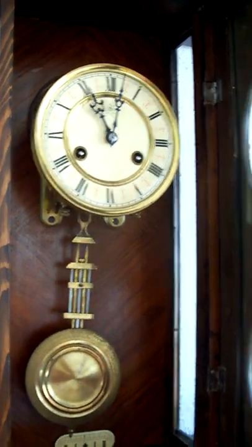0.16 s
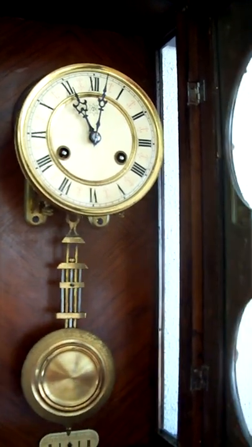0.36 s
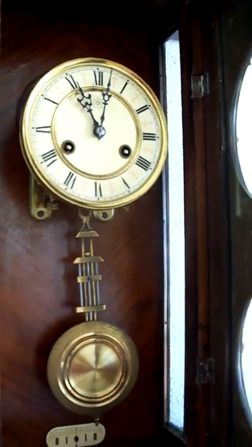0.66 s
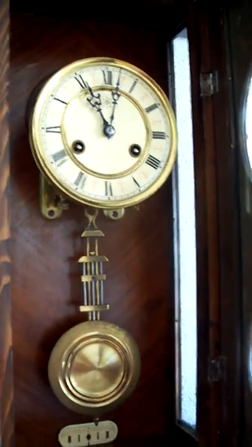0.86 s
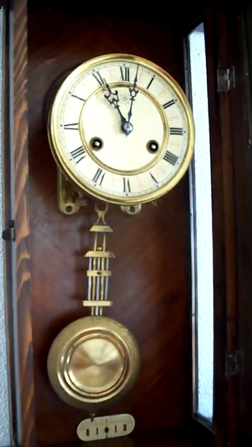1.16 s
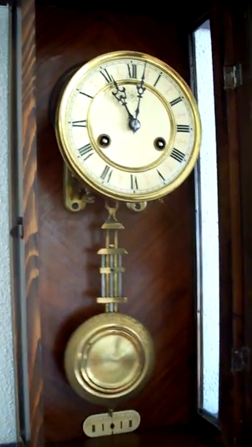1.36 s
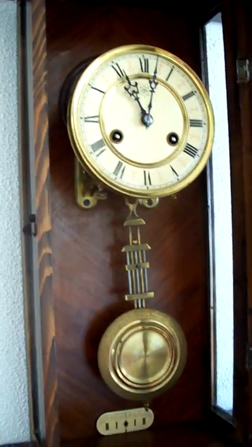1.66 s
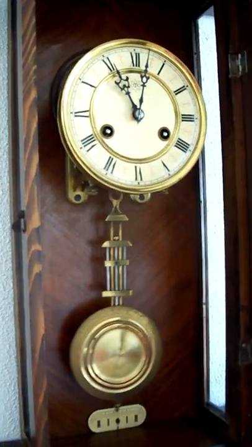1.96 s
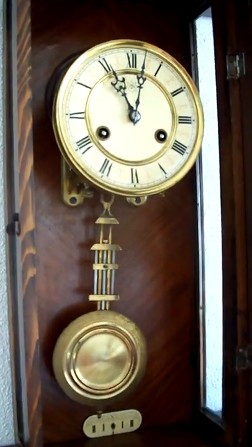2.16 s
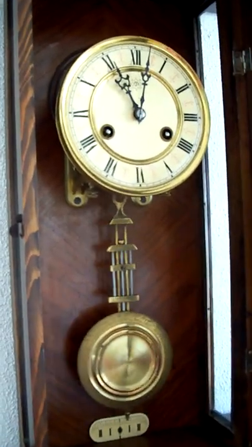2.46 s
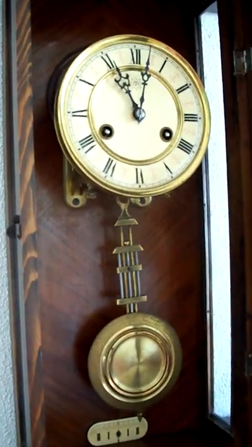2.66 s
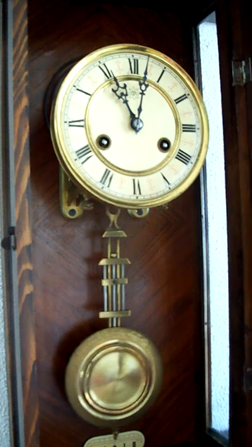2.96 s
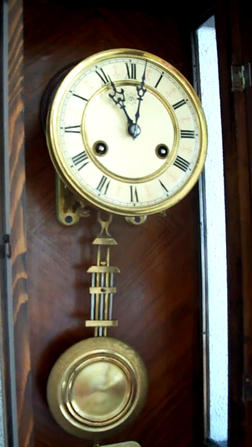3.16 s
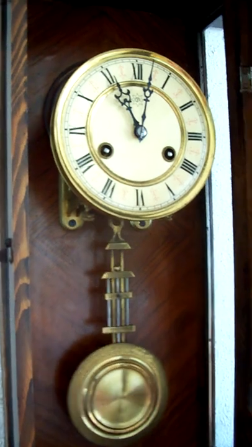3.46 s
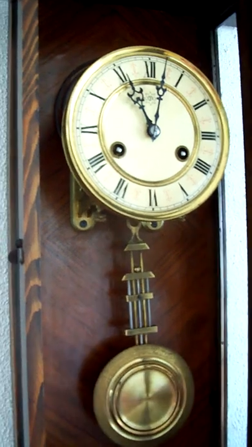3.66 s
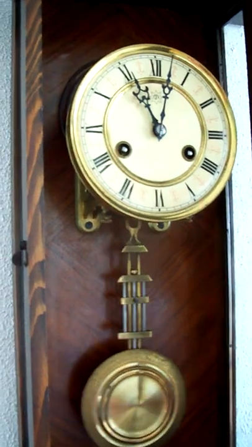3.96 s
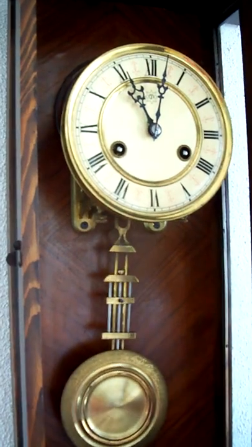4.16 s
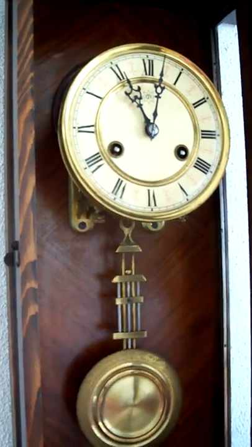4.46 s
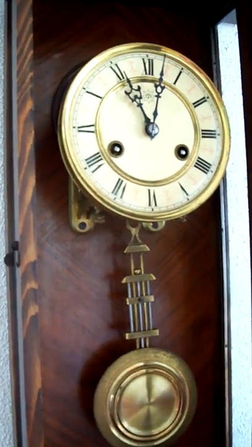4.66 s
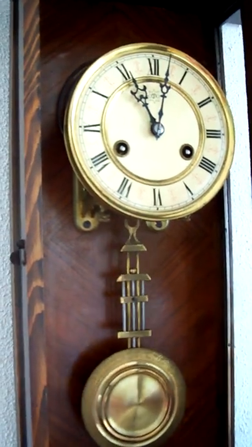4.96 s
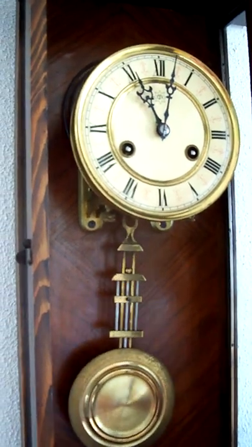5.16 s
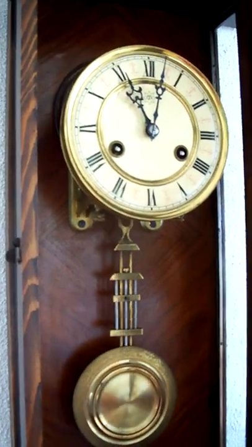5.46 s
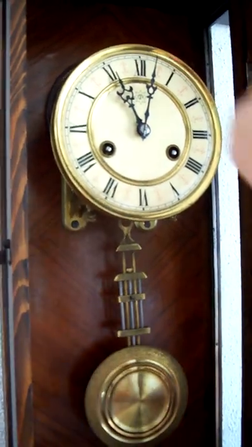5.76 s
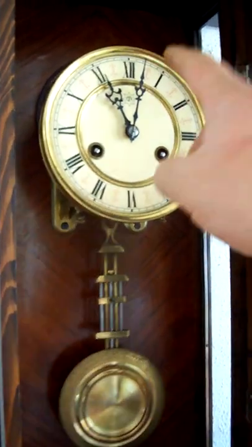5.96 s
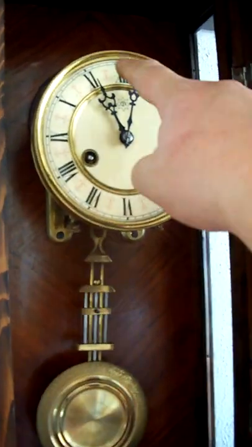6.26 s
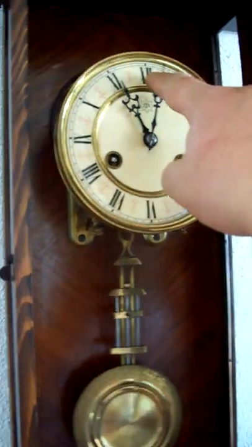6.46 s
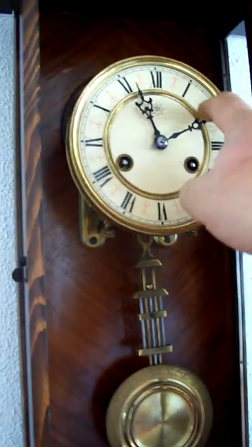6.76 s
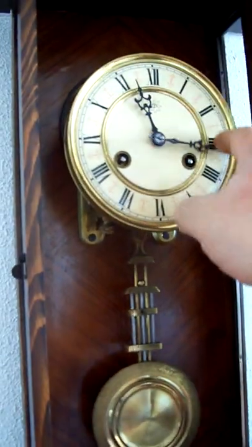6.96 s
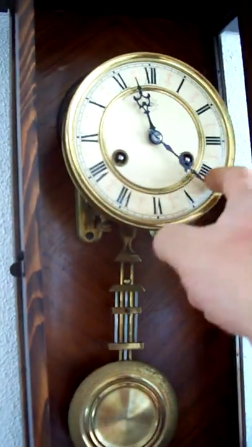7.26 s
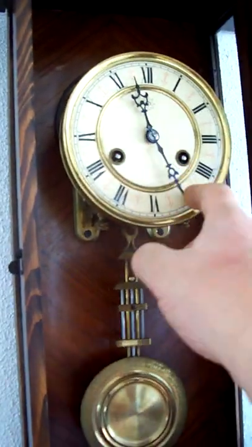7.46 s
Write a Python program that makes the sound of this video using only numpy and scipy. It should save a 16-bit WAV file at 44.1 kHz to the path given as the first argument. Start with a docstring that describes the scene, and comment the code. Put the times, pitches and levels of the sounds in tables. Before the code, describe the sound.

Close indoors, a pendulum clock's lingering gong tone is renewed by two metallic blows, with ticking, gear whirr, and a click that ends the whirring.

```python
"""A wall clock's coiled gong rings on from an earlier blow while its strike train whirrs and its escapement ticks.
Knocks of the works stand out and a finger bumps the phone; two new blows follow, each resetting decaying sines.
A short low tone sounds before the second; soon after it the lever clicks and the train runs down.
A hand then enters the open case and recolours the ring. Noise in resonances makes the knocks and clicks;
hiss, wavering hums and faint high tones fill the room throughout, heard close by through a hand-held phone."""
import sys
import numpy as np
from scipy import signal
from scipy.fft import rfft, irfft
from scipy.io import wavfile
from scipy.ndimage import uniform_filter1d

SR = 44100
rng = np.random.default_rng(int(sys.argv[2]) if len(sys.argv) > 2 else 0)


def output_pcm(signal):
    """Save a mono or channel-first signal as 16-bit PCM at the path in sys.argv[1].

    Samples are clipped to [-1, 1] before scaling.
    """
    pcm = np.clip(np.atleast_2d(signal).T, -1, 1) * 32767
    wavfile.write(sys.argv[1], SR, np.round(pcm).astype(np.int16))


N = 335160

# Hammer blows on the gong; the first row is the ring of an earlier blow.
# Each row: start in seconds, knock level in dB, wash level in dB.
BLOWS = [(0, -78, -42.5), (1.876, -30.5, -34), (4.308, -25.5, -34)]
# Modes of the coil, mostly in pairs from two bending planes.
# Each row: frequency in Hz, t60 in seconds, level in dB after blows 1, 2 and 3,
# change in dB while the phone is shifted, change in dB once the hand is in the case.
GONG_MODES = [(171.8, 15.4, -48.5, -46.0, -46.5, 1, 2), (223.7, 5, -46, -40, -38, 0, 0),
              (284.4, 30.0, -34.5, -27.5, -39.5, -1, -2), (316.5, 15, -53, -56, -51, 0, -1),
              (350.3, 4.4, -53.5, -42.0, -40.5, 0, 0), (421.4, 9.9, -45.5, -41.0, -40.0, -2, 2),
              (425.5, 18.1, -50.0, -52.5, -51.5, 2, 7), (498.6, 5.1, -39.5, -31.5, -30.5, 0, -1),
              (506.5, 30, -41.5, -46, -55, 0, 17), (582.2, 6.0, -37.0, -31.5, -30.5, 0, -2),
              (591.6, 30.0, -43.0, -48.5, -41.0, -3, -1), (637.5, 25, -58, -47, -60, 0, -3),
              (645.8, 12, -53, -60, -52, 0, -5), (671.4, 2.6, -34.5, -23.0, -22.5, 0, 0),
              (683.6, 23.8, -43.5, -37.0, -44.5, 0, -6), (731.0, 12, -53, -60, -50, 0, -5),
              (767.1, 4.2, -40.5, -34.5, -40.5, 0, 0), (781.2, 30.0, -37.0, -39.5, -36.0, -4, -3),
              (816.2, 20, -54, -66, -57, 0, 0), (868.3, 3.2, -44.5, -31.5, -30.5, 0, 0),
              (884.3, 4.8, -40.0, -39.5, -30, 0, 4), (974.8, 2.0, -52.0, -33.0, -31.0, 0, 0),
              (992.1, 10.4, -36.0, -31.5, -27.5, -3, 0), (1005.3, 10, -57, -55, -49, 0, -5),
              (1013.2, 15, -66, -55, -58, 0, 0), (1089.4, 1.5, -62, -36, -46, 0, 0),
              (1107.1, 13.5, -45.0, -37.0, -37.5, 3, 7), (1164.1, 7, -62, -53, -46, 0, 0),
              (1205.5, 4.0, -45.0, -36.0, -34.5, 0, 0), (1224.5, 18, -46.0, -42.0, -36, -1, -5),
              (1278.5, 8, -66, -58, -54, 0, 0), (1327.7, 3.6, -57.0, -46.5, -43.0, 0, 0),
              (1349.6, 5.4, -38.5, -32.0, -32.0, -1, -9), (1391.9, 9, -60, -60, -58, 0, 0),
              (1458.9, 1.3, -62, -31, -42, 0, 0), (1480.6, 3.6, -32.0, -28.0, -34.0, 0, 0),
              (1616.3, 9.1, -44.5, -39.0, -36.5, -15, -2), (1731.1, 1.7, -62, -42, -43, 0, 0),
              (1755.1, 8.4, -42.5, -44.0, -45.0, -3, -13), (1875.6, 2, -62, -43, -46, 0, 0),
              (1901.4, 7.5, -46.5, -40.5, -37.5, 0, 2), (2021.4, 1.4, -69.5, -35.5, -33.0, 0, 0),
              (2049.9, 5.8, -46.0, -45.0, -51.0, -4, 8), (2175.5, 1.8, -71.0, -48.0, -52.5, 0, 0),
              (2206.1, 7.9, -52.5, -37.0, -40.5, 11, 6), (2332.0, 0.93, -67.0, -41.0, -37.5, 0, 0),
              (2365.6, 3.3, -47.5, -32.5, -33.0, 0, 0), (2501.0, 0.43, -61.0, -35.0, -38.0, 0, 0),
              (2530.6, 3.6, -48.5, -42.0, -43.5, 0, 0), (2663.2, 0.39, -71.0, -38.5, -32.0, 0, 0),
              (2697.1, 4.0, -56.0, -48.0, -46.0, 0, 0), (2836.5, 0.45, -70, -36, -32, 0, 0),
              (2868.9, 4.0, -49.5, -42.0, -39.0, 0, 0), (3006.4, 0.45, -64.5, -37.5, -32.0, 0, 0),
              (3042.8, 3.8, -49.5, -41.0, -39.5, 0, 0), (3183.7, 0.47, -68.5, -47.5, -41.0, 0, 0),
              (3223.1, 2.2, -58.5, -40.0, -51.0, 0, 0), (3363.4, 0.45, -80, -55, -42, 0, 0),
              (3403.2, 2.8, -70.0, -51.5, -51.0, 0, 0), (3587.7, 1.6, -78.0, -50.5, -47.5, 0, 0),
              (3780.5, 1.0, -75.5, -47, -39, 0, 0), (3977.7, 1.9, -72.0, -53, -45, 0, 0),
              (4391.8, 1.8, -73.0, -55, -48, 0, 0), (4606.1, 2.4, -67.0, -52, -46, 0, 0),
              (4827.1, 3.7, -80, -69, -61, 0, 0), (5055.1, 1.9, -68.0, -50, -50, 0, 0),
              (5286.0, 3.1, -63.0, -57, -53, 0, 0), (5523.7, 2.5, -75.0, -55, -66, 0, 0),
              (5763.3, 1.8, -68.5, -54, -53, 0, 0), (6011.0, 1.2, -85, -66, -54, 0, 0)]
# Spectrum of the hiss after a blow, shared by the knock. Each row: frequency in Hz, relative density in dB.
WASH_SPECTRUM = [(90, -46), (150, -29.5), (320, -17), (430, -24), (700, -11.5), (1200, -13.5), (1600, -18),
                 (2300, -22.5), (3200, -32.5), (5000, -37), (7500, -43.5), (9000, -60)]
# Brass plates and wheels, lower and upper resonances.
# Each row: frequency in Hz, width in Hz, relative level in dB.
WORKS_LOW = [(2120, 370, -1), (2540, 76, 0.5), (3180, 110, -3)]
WORKS_HIGH = [(5250, 400, -4), (5720, 220, -2), (6430, 190, 0), (7200, 350, -1), (7750, 400, -5)]
# Spectrum of the room hiss. Each row: frequency in Hz, relative density in dB.
ROOM_SPECTRUM = [(15, -32), (25, -10), (60, -4), (130, -12), (250, -19), (420, -20.5), (650, -17.5),
                 (1050, -17), (1500, -28.5), (2200, -34.5), (3200, -42.5), (4200, -39), (5200, -43),
                 (6500, -42), (7800, -41), (8400, -53)]
# Low hums. Each row: frequency in Hz, width in Hz, mean level in dB rms before wavering.
HUMS = [(35, 12, -51), (63, 11, -71), (79, 19, -57)]
# Faint high tones. Each row: frequency in Hz, level in dB rms before wavering.
HIGH_TONES = [(7827, -77.5), (8172, -91.5)]
# Escapement beats. Each row: start in seconds, peak level in dB of the upper works.
BEATS = [(0.0323, -42), (0.536, -42.5), (1.0467, -41), (1.544, -41.5), (2.5701, -53), (3.091, -39.5),
         (3.5758, -41.5), (4.054, -42.5), (4.5844, -47), (5.0703, -44), (5.6112, -40.5), (6.0711, -45.5),
         (6.6202, -33.5), (7.073, -42)]
# Colour of the two pallets, tick then tock.
# Each row: lower works share in dB, case share in dB, t60 in seconds.
PALLETS = [(-0.5, -1.5, 0.029), (3, 9, 0.031)]
# Wooden case. Each row: frequency in Hz, width in Hz, relative level in dB.
CASE = [(330, 120, 3), (700, 250, -2), (1000, 200, 0), (1800, 200, -6), (2230, 120, -4)]
# Ring of the escapement anchor. Each row: frequency in Hz, width in Hz, level in dB re the beat.
ANCHOR = [(6480, 300, 1), (3180, 300, 0)]
# Knocks of the works: the wheel train's loudest, plus the hammer's release just before each new blow.
# Each row: start in seconds, peak level in dB of the upper works.
WORKS_KNOCKS = [(0.188, -35), (0.445, -36), (0.738, -33), (0.9724, -29.5), (1.0073, -33.5), (1.219, -32.5),
                (1.4373, -36), (1.503, -34), (1.862, -37), (2.2904, -32), (2.6185, -35), (3.5179, -34),
                (3.9648, -30.5), (4.296, -36)]

CREST_DB = 9  # peak over rms of a short noise burst
LEVER_S = 4.5201  # the lever locks the train
WORKS_LOW_DB = -5  # lower works re upper works, in whirr and knocks


def undb(db):
    """Level law: decibels to an amplitude ratio."""
    return 10 ** (np.asarray(db, float) / 20)


def level(x, db):
    """Mean power: scale a signal to the given rms level."""
    return x * undb(db) / np.sqrt(np.mean(x ** 2))


def fade(t, t60):
    """Exponential damping: from 1 at t = 0 down 60 dB after t60 seconds, silent before."""
    return np.where(t >= 0, np.exp(-np.log(1000) * np.maximum(t, 0) / t60), 0)


def noise(points):
    """Spectral shaping: white noise weighted along a log-frequency curve, rms 1."""
    hz, db = np.transpose(points)
    f = np.fft.rfftfreq(N, 1 / SR) + 1  # 1 Hz offset keeps the logarithm finite
    gain = undb(np.interp(np.log(f), np.log(hz), db))
    return level(irfft(rfft(rng.standard_normal(N)) * gain, N), 0)


def resonate(x, modes):
    """Modal superposition: parallel second-order resonances driven by one signal."""
    out = 0
    for hz, width, db in modes:
        b, a = signal.iirpeak(hz, hz / width, fs=SR)
        out = out + undb(db) * signal.lfilter(b, a, x)
    return out


def shaken(modes, envelope):
    """Forced vibration: noise-driven resonances under an envelope of peak amplitude."""
    return envelope * level(resonate(rng.standard_normal(N), modes), -CREST_DB)


def walk(rate):
    """Slow random variation: levels held 1 / rate seconds, smoothed twice, spread near 1."""
    hold = int(SR / rate)
    steps = np.repeat(rng.standard_normal(N // hold + 1), hold)
    return 1.3 * uniform_filter1d(uniform_filter1d(steps, hold), hold)[:N]


def gong(t, rise_s=.003, waver_db=.6):
    """Damped modal vibration: each blow gives every mode a new size and phase."""
    out = np.zeros(N)
    starts = [int(row[0] * SR) for row in BLOWS] + [N]
    hand = np.interp(t, (5.77, 6.12), (0, 1))
    # the phone shifts in the standing waves; the change holds until the next blow
    shift = np.interp(t, (1, 1.2), (0, 1)) * (t < BLOWS[1][0])
    phases = rng.uniform(0, 2 * np.pi, (len(GONG_MODES), 3))
    sway = [walk(3) for _ in range(6)]  # the hand-held phone sways
    for m, (hz, t60, *levels_db, shift_db, hand_db) in enumerate(GONG_MODES):
        colour_db = shift_db * shift + hand_db * hand + waver_db * sway[m % 6]
        for k, db in enumerate(levels_db):
            a, b = starts[k], starts[k + 1]
            u = t[:b - a]
            rise = 1 - np.exp(-u / rise_s) if k else 1  # the first ring is already under way
            size = undb(db + colour_db[a:b] - 60 * u / t60)
            out[a:b] += size * rise * np.sin(2 * np.pi * hz * u + phases[m, k])
    return out


def wash(t, t60=1.6, linger_db=-8, linger_t60=7.):
    """Double-slope decay: soft broadband hiss under the ring, fading first fast, then slowly."""
    envelope = 0
    for s, _, db in BLOWS:
        decay = fade(t - s, t60) + undb(linger_db) * fade(t - s, linger_t60)
        envelope = envelope + undb(db) * decay
    return envelope * noise(WASH_SPECTRUM)


def chatter(t, modes, rate, scatter_db, grain_t60):
    """Random impact excitation: each mode is jolted at its own moments over a steady rub; rms 1."""
    grain = fade(t[:SR // 10], grain_t60)
    out = 0
    for mode in modes:
        scatter = np.minimum(rng.exponential(size=N), 3)
        hits = (rng.random(N) < rate / SR) * undb(scatter_db * scatter)
        jolts = level(signal.fftconvolve(hits, grain)[:N], 0)
        out = out + shaken([mode], undb(mode[2]) * (.6 + jolts))
    return level(out, 0)


def train_whirr(t, whirr_db=-56.5, swell_db=1., run_down_db_per_s=55):
    """Many small impacts: wheels and fly whirr until the lever locks, then the fly spins down."""
    run_down_db = run_down_db_per_s * np.maximum(t - LEVER_S, 0)
    running = undb(whirr_db + swell_db * walk(1.3) - run_down_db)
    high = chatter(t, WORKS_HIGH, 80, 3.0, .03)
    low = chatter(t, WORKS_LOW, 40, 1.4, 0.093)
    return running * (high + undb(WORKS_LOW_DB) * low)


def room_hiss():
    """Stationary broadband noise: the quiet room's hiss, strongest at low frequencies."""
    return level(noise(ROOM_SPECTRUM), -46)


def rumble():
    """Narrow-band noise: low hums whose levels waver at random."""
    out = 0
    for hz, width, db in HUMS:
        hum = level(resonate(rng.standard_normal(N), [(hz, width, 0)]), db)
        out = out + hum * undb(2.5 * walk(2.5))
    return out


def whine(t):
    """Pure tones: faint high sines with slightly wavering levels."""
    out = 0
    for hz, db in HIGH_TONES:
        size = np.sqrt(2) * undb(db + 1.5 * walk(8.8))  # rms to peak
        out = out + size * np.sin(2 * np.pi * hz * t)
    return out


def double_click(t, s, t60, drop, hold_s=.007, tail=.1, tail_t60=.35, rise_s=.0012):
    """Successive impacts: an unlocking and a drop some ms later, with a faint tail."""
    def jolt(u, jolt_t60):
        """Impulsive onset: a short linear rise times an exponential decay."""
        return fade(u, jolt_t60) * np.clip(u / rise_s, 0, 1)

    u = t - s
    return jolt(u, t60) + drop * jolt(u - hold_s, t60) + tail * jolt(u, tail_t60)


def shake_clock(t, rows):
    """Coupled resonators: clicks shake works and case; returns the sound and the bright envelope."""
    bright = low = case = 0
    for s, db, low_db, case_db, t60 in rows:
        dull = undb(db) * double_click(t, s, t60, drop=.9)
        bright = bright + undb(db) * double_click(t, s, t60, drop=.55)  # the drop is duller
        low = low + undb(low_db) * dull
        case = case + undb(case_db) * dull
    sound = shaken(WORKS_HIGH, bright) + shaken(WORKS_LOW, low) + shaken(CASE, case)
    return sound, bright


def ticks(t, beat_s=.505):
    """Escapement impacts: tick and tock alternate each half pendulum period and ring the anchor."""
    rows = [(s, db, *PALLETS[round(s / beat_s) % 2]) for s, db in BEATS]
    sound, bright = shake_clock(t, rows)
    anchor = sum(shaken([mode], undb(mode[2]) * bright) for mode in ANCHOR)
    return sound + anchor


def works_knocks(t, t60=0.019):
    """Impact excitation: the train's loudest knocks and the hammer's releases ring the brass works."""
    knocks = sum(undb(db) * fade(t - s, t60) for s, db in WORKS_KNOCKS)
    return shaken(WORKS_HIGH, knocks) + shaken(WORKS_LOW, undb(WORKS_LOW_DB) * knocks)


def handling_bump(t, s=0.84, db=-41, t60=0.21):
    """Contact noise: a finger shifts on the phone, a decaying burst of low noise."""
    return undb(db) * fade(t - s, t60) * noise([(20, -3), (60, -1), (180, 0), (400, -43), (900, -95)])


def hammer(t, knock_t60=.04, clang_db=-2, clang_t60=0.12):
    """Impact radiation: a short knock through case and works with a bright clang of hammer on wire."""
    knock = sum(undb(db) * fade(t - s, knock_t60) for s, db, _ in BLOWS)
    bright = level(resonate(rng.standard_normal(N), WORKS_HIGH), -11.5)
    clang = sum(undb(db + clang_db + CREST_DB) * fade(t - s, clang_t60) for s, db, _ in BLOWS)
    return knock * (noise(WASH_SPECTRUM) + bright) + shaken([(2880, 420, 0)], clang)


def low_tone(t, start_s=3.83, end_s=4.16, hz=75, db=-39.5):
    """Gated sinusoid: one short low tone with sloped edges."""
    corners_s = (start_s, start_s + 0.017, end_s - .04, end_s)
    gate = np.interp(t, corners_s, (0, 1, 1, 0))
    return undb(db) * gate * np.sin(2 * np.pi * hz * t)


def lever_click(t, peak_db=-18, low_db=-12, case_db=-8, t60=.028):
    """Impact excitation: the locking lever clicks through works and case."""
    sound, _ = shake_clock(t, [(LEVER_S, peak_db, low_db, case_db, t60)])
    return sound


def scene():
    """Linear superposition: the pressures of all sources add at the phone."""
    t = np.arange(N) / SR
    ring = gong(t) + wash(t)
    room = room_hiss() + rumble() + whine(t)
    works = train_whirr(t) + ticks(t) + works_knocks(t) + lever_click(t)
    events = handling_bump(t) + hammer(t) + low_tone(t)
    return (ring + room + works + events)[None]


def record(dry, dip_hz=4200, dip_width_hz=1500, dip_share=.75, top_hz=8050):
    """Band limitation: the microphone port cancels part of a band and the phone cuts the top."""
    heard = dry - dip_share * resonate(dry, [(dip_hz, dip_width_hz, 0)])
    low_pass = signal.ellip(8, .2, 56, top_hz, fs=SR, output="sos")  # 0.2 dB ripple, 56 dB stop
    return signal.sosfilt(low_pass, heard)


dry = scene()
out = record(dry)
output_pcm(out)
```